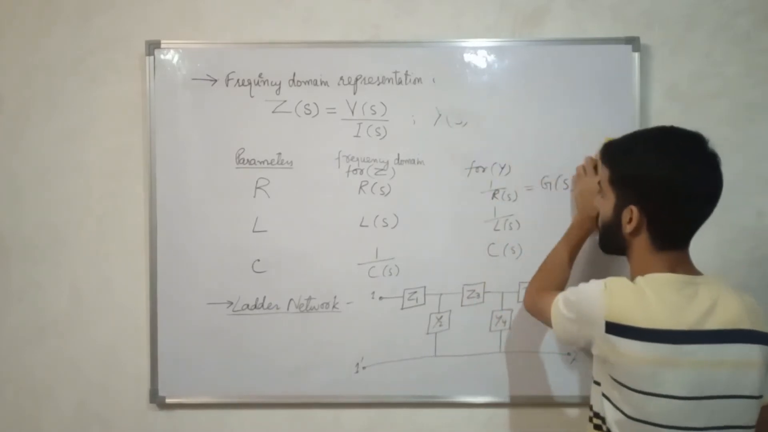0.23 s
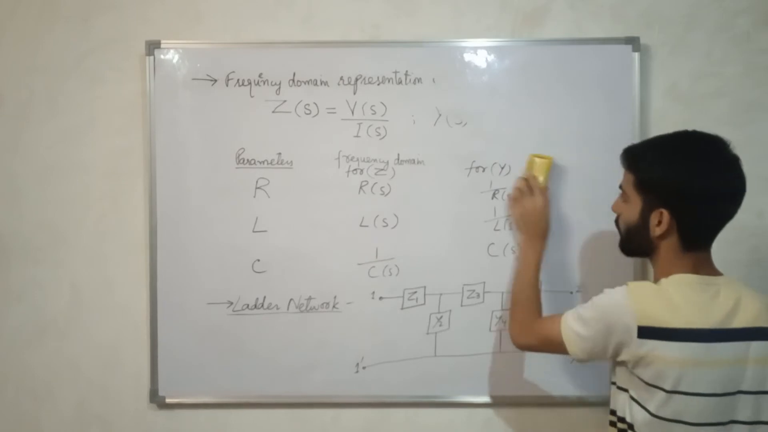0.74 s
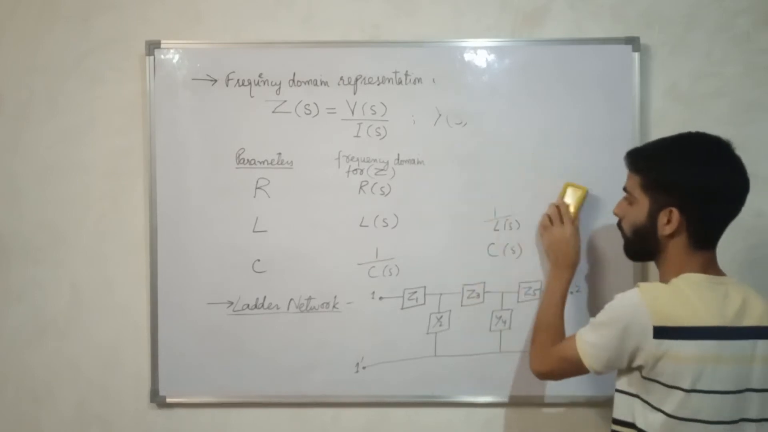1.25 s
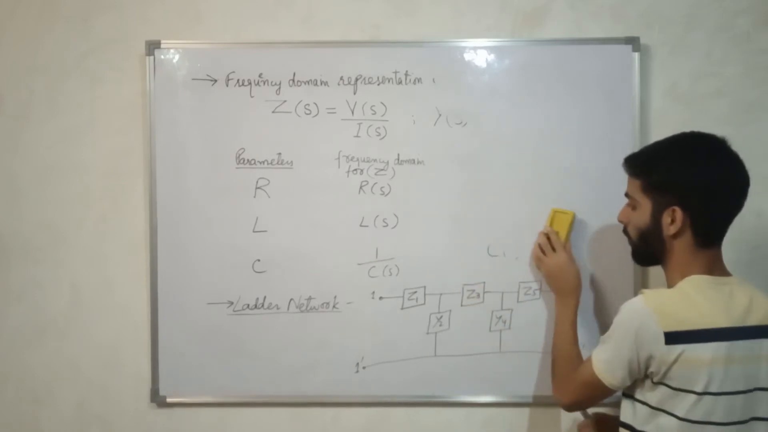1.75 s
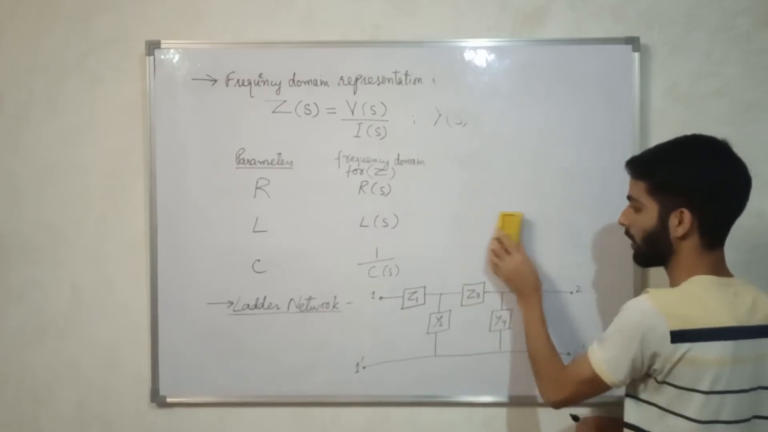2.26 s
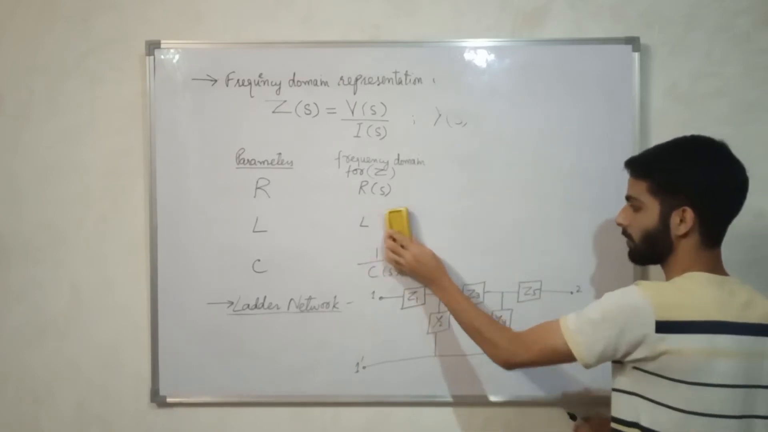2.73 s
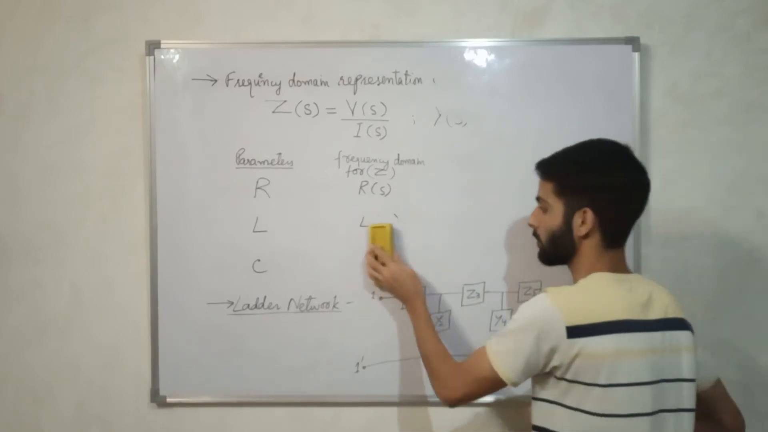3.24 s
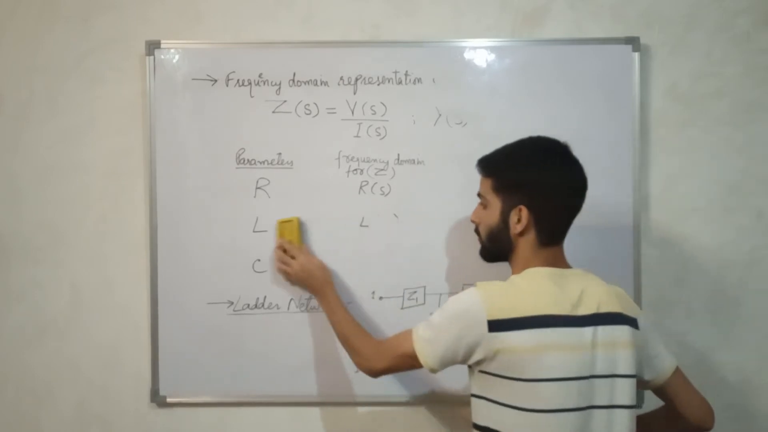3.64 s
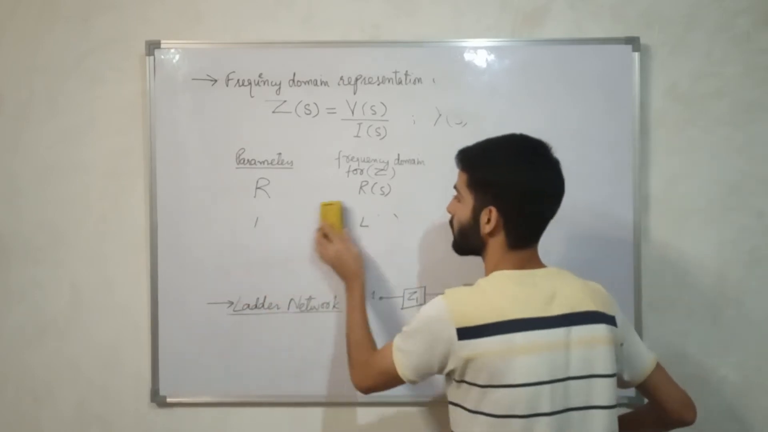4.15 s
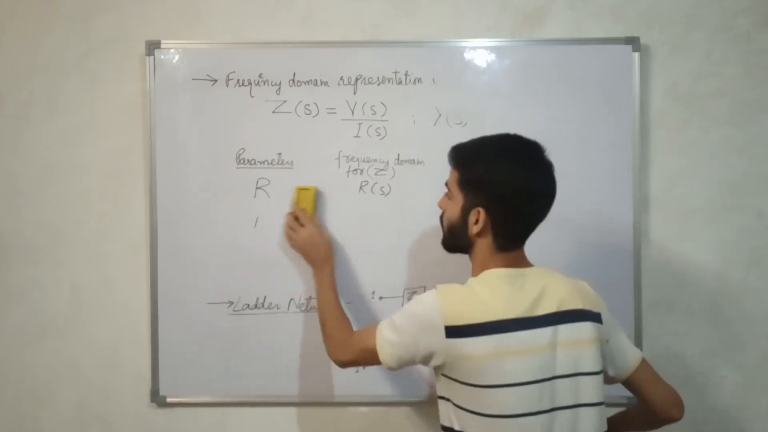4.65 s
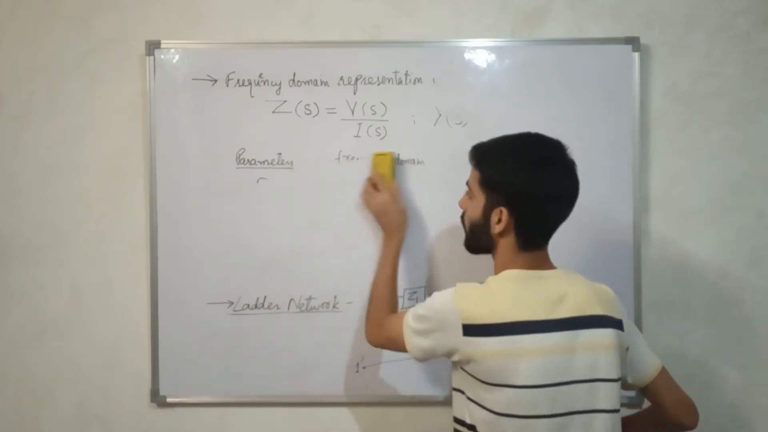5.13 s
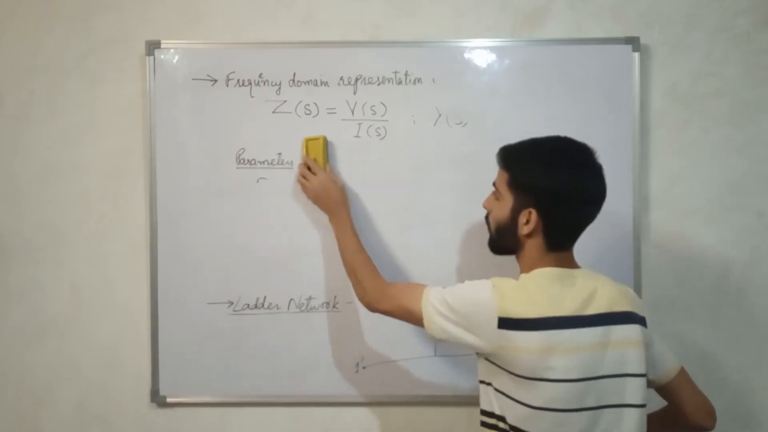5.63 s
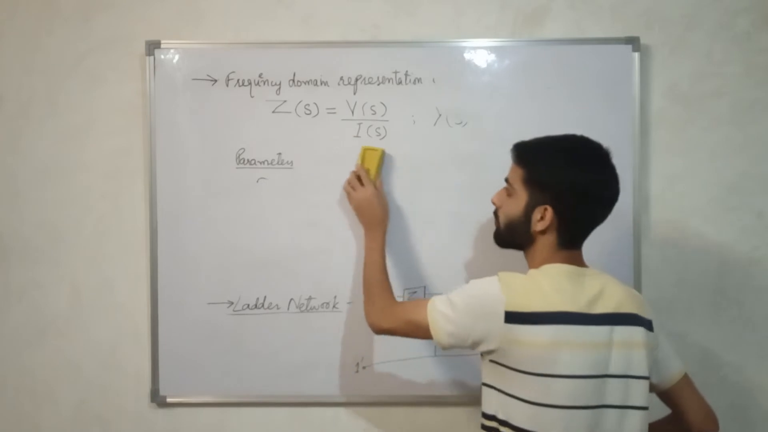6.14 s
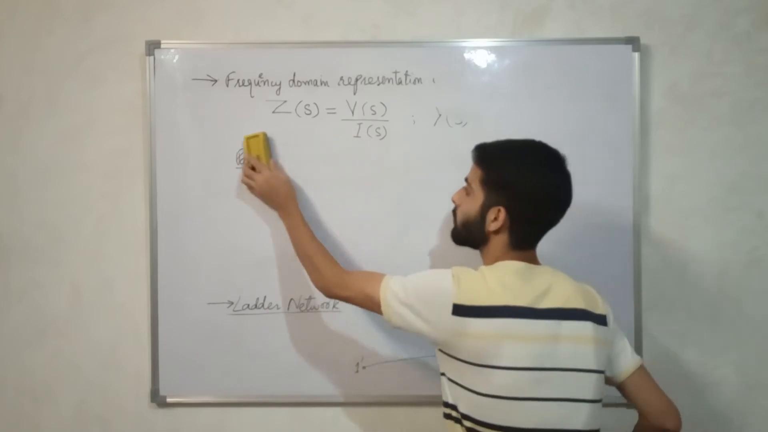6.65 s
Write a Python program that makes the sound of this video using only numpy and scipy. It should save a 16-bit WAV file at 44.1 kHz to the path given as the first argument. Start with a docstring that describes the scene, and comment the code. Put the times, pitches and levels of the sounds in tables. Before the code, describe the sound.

Quick back-and-forth felt wipes on a hollow wall board, each swelling and stopping short. Airy high hiss dominates, mixed with rough scraping, low panel boom and irregular plastic knocks, most frequent in the first few seconds. The middle strokes are smoother, then slower wipes bring a few more thumps before a softer, plainer rub at the end. Short reflections of a bare room, a quiet rumbling background, stereo pickup from nearby.

```python
"""A hiss of felt, already in mid-stroke, comes and goes as an eraser is rubbed over a wall-hung whiteboard.
Stick-slip jolts of the fibres make the hiss, coarser ones a lower scrape and the ring of the plastic holder.
Slips of the whole pad drum on the panel's resonances; at times the holder rocks and knocks on the board.
One burst of grit ticks, and a faint rumble with a wavering hum lies underneath, in a small bare classroom."""
import sys
import numpy as np
from scipy import signal
from scipy.fft import rfft, irfft, next_fast_len
from scipy.io import wavfile
from scipy.ndimage import uniform_filter1d, map_coordinates

SR = 44100
rng = np.random.default_rng(int(sys.argv[2]) if len(sys.argv) > 2 else 0)


def generate_wav(sig):
    """Save sig (samples, or channels by samples) to the path in sys.argv[1] as 16-bit PCM at SR."""
    pcm = np.round(np.clip(np.atleast_2d(sig).T, -1, 1) * 32767).astype(np.int16)
    wavfile.write(sys.argv[1], SR, pcm)


N = 303849

# Sweeps of the arm. Each row: start in seconds, end in seconds, where the hand presses hardest (0-1 of the way),
# then nominal levels in dB of the felt's hiss, the scrape, the panel's low modes and its upper modes,
# the holder's ring in dB relative to the scrape, and the treble tilt in dB.
STROKE_TABLE = [(-0.186, 0.272, 0.18, -53, -63.5, -49.5, -58, -12, -0.5),
                (0.293, 0.507, 0.53, -51.5, -60, -52, -60.5, -10, -3.5),
                (0.544, 0.709, 0.2, -52.5, -65.5, -56.5, -67.5, -19, -1),
                (0.699, 1.011, 0.61, -51, -57.5, -40.5, -51.5, -9.5, -1),
                (1.024, 1.32, 0.66, -54.5, -64.5, -48.5, -56.5, -10, 0),
                (1.318, 1.53, 0.51, -51.5, -59, -39.5, -55, -8.5, -2),
                (1.578, 1.8, 0.18, -53, -62.5, -47.5, -55.5, -14, -.2),
                (1.812, 2.032, 0.7, -51, -56.5, -46.5, -53, -12, -1),
                (2.065, 2.242, 0.57, -52.5, -60.5, -52.5, -61, -25, -0.5),
                (2.246, 2.706, 0.16, -51.3, -55.5, -46, -57.5, -14.5, -1),
                (2.742, 2.958, 0.56, -56.5, -65, -60, -73, -14, .1),
                (2.963, 3.249, .45, -52.5, -56.5, -54, -66.5, -16, -0.7),
                (3.247, 3.42, 0.78, -55.5, -62.5, -54, -67, -20, -0.5),
                (3.44, 3.964, 0.26, -51.5, -56, -49, -62, -15, -0.6),
                (3.981, 4.461, 0.7, -53, -63.5, -48, -61, -11.5, 1),
                (4.476, 4.947, 0.27, -50, -55, -43.5, -58.5, -14.5, -1.3),
                (4.958, 5.394, 0.54, -52, -62, -44.5, -56, -8.5, 0),
                (5.405, 5.716, 0.57, -52.5, -57, -42.5, -52.5, -7.5, 0),
                (5.742, 6.006, 0.47, -53, -62.5, -43, -58.5, -9, -0.5),
                (6.027, 6.494, 0.14, -54, -57, -50, -65, -12, -0.5),
                (6.407, 6.947, 0.23, -55.5, -59.5, -61.5, -67.5, -10.5, -1.5)]
# Spectrum of rubbed felt fibres. Each row: frequency in Hz, relative level in dB.
FELT_SPECTRUM = [(600, -33), (1200, -19.5), (2000, -20), (3200, -16), (4200, -9), (5500, -9), (7000, -7.5),
                 (8000, -2), (9300, -0.5), (10300, -2.5), (12000, -10.5), (14000, -14.5), (16000, -17.5)]


def amp(db):
    """Decibels to amplitude ratio."""
    return 10 ** (np.asarray(db) / 20)


def unit(x):
    """Normalisation to rms 1."""
    return x / np.sqrt(np.mean(x ** 2) + 1e-20)


def along(points, hz):
    """Interpolation of (Hz, value) points on a logarithmic frequency axis."""
    f, v = np.transpose(points)
    return np.interp(np.log(hz + 1), np.log(f + 1), v)


def wobble(rate):
    """Smooth random modulation: a spline through random knots, rate of them a second."""
    knots = rng.standard_normal(int(N * rate / SR) + 4)
    return map_coordinates(knots, [np.arange(N) * rate / SR])


def filtered(x, response):
    """Linear filtering: the spectrum of x times a response of frequency."""
    m = next_fast_len(N + SR // 2)
    hz = np.fft.rfftfreq(m, 1 / SR)
    return irfft(rfft(x, m) * response(hz), m)[..., :N]


def coloured(x, spectrum):
    """Spectral shaping of x by a table of levels, at rms 1."""
    return unit(filtered(x, lambda hz: amp(along(spectrum, hz))))


def low_and_upper(x, split_hz=356):
    """Crossover: x parted into what lies below and above a frequency."""
    low = filtered(x, lambda hz: 1 / (1 + (hz / split_hz) ** 20))
    return low, x - low


def tilted(x, tilt_db, pivot_hz):
    """Shelving: a positive tilt lifts what lies above the pivot by half and lowers the rest by half."""
    low, upper = low_and_upper(x, pivot_hz)
    return low * amp(-tilt_db / 2) + upper * amp(tilt_db / 2)


def spread(pair, alike=None):
    """Coherence of a diffuse field: two unrelated signals become left and right, alike by frequency."""
    if alike is None:
        # Coherence of the channels. Each row: frequency in Hz, left-right likeness (0-1).
        alike = [(50, 0), (110, 0.8), (180, 1), (270, 0.94), (400, 0.8), (700, 0.56), (1250, 0),
                 (16000, 0.012)]

    def mid_and_side(hz):
        turn = np.arccos(np.clip(along(alike, hz), -1, 1)) / 2
        return np.array([np.cos(turn), np.sin(turn)])

    mid, side = filtered(pair, mid_and_side)
    return np.array([mid + side, mid - side])


def slips(rate, scatter_db):
    """Stick-slip friction: two trains of jolts, rate a second, random in time, sign and size; rms 1."""
    caught = rng.random((2, N)) < rate / SR
    sizes = amp(scatter_db * rng.standard_normal((2, N)))
    return unit(caught * sizes * rng.choice([-1, 1], (2, N)))


def background(rumble_db=-62, hum_db=-70.5, hum_hz=95.8, wander_hz=1.0, waver_db=3):
    """Superposition of broadband low room noise and a faint hum that wavers in pitch and level."""
    # Room noise. Each row: frequency in Hz, relative level in dB.
    rumble_spectrum = [(20, -46), (33, -19), (45, -1.5), (56, -5), (75, 1.5), (120, 4.5), (180, 2),
                       (280, -6.5), (450, -6), (800, -16), (1500, -21.5), (5000, -22), (16000, -53)]
    # Coherence of the room noise. Each row: frequency in Hz, left-right likeness (0-1).
    rumble_alike = [(50, 0.17), (110, 0.32), (250, 0.018), (700, 0.07), (1250, 0.12)]
    rumble = coloured(spread(rng.standard_normal((2, N)), rumble_alike), rumble_spectrum)
    phase = 2 * np.pi * np.cumsum(hum_hz + wander_hz * wobble(5.4)) / SR
    hum = np.sin(phase) * amp(waver_db * wobble(6))
    return amp(rumble_db) * rumble + amp(hum_db) * unit(hum)


def room(x):
    """Reverberation: absorption by the walls makes every frequency die at its own speed."""
    # Decay of the room. Each row: frequency in Hz, time to fall by 60 dB in seconds.
    wall_decay = [(150, 0.78), (500, 0.43), (3000, 0.25), (12000, 0.061)]
    hz, t, z = signal.stft(rng.standard_normal((2, SR // 2)), SR, nperseg=256)
    decay = amp(-60 * t / along(wall_decay, hz)[:, None])
    tail = signal.istft(z * decay, SR, nperseg=256)[1]
    tail = np.pad(tail / np.linalg.norm(tail[0]), ((0, 0), (SR // 200, 0)))  # walls answer 5 ms late
    return spread(signal.fftconvolve(np.atleast_2d(x), tail, axes=1)[:, :N])


def near_walls(pair, echo_db, reach_s, count=8):
    """Interference: early reflections within reach_s put a fine fixed ripple on the spectrum."""
    paths = np.zeros((2, SR // 20))
    paths[:, 0] = 1  # direct sound
    for path in paths:
        delays = (rng.uniform(.1, 1, count) * reach_s * SR).astype(int)
        path[delays] += amp(echo_db) * rng.choice([-1, 1], count)
    return signal.fftconvolve(pair, paths, axes=1)[:, :N]


def grit(tick_t60=.005, tick_db=-5, wet_db=-4):
    """Impulsive release: a hard speck snaps free under the felt with a few ticks (decay in seconds)."""
    # Ticks. Each row: start in seconds, level in dB before the common tick_db.
    ticks_table = [(3.932, -35.5), (3.938, -44), (3.947, -38)]
    t = np.arange(N) / SR
    bursts = sum((t >= s) * amp(db + tick_db - 60 * np.abs(t - s) / tick_t60) for s, db in ticks_table)
    ticks = bursts * coloured(rng.standard_normal((2, N)), FELT_SPECTRUM)
    return ticks + amp(wet_db) * room(ticks)


def panel_ring():
    """Modal impulse response: one jolt gives a short low bump and ringing modes, peak 1."""
    # Broad response of the board. Each row: frequency in Hz, relative level in dB.
    panel_spectrum = [(40, -35), (100, -19.5), (170, -5), (250, -1.5), (320, -4), (400, -11.5),
                      (520, -15.5), (650, -24.5), (1000, -30.5), (2000, -55), (5000, -100)]
    # Resonances of the board. Each row: centre in Hz, width in Hz, lift in dB.
    modes = [(148, 21, 3), (180.6, 16, 1), (223.3, 19, 5), (244.7, 16.4, 8.5), (261.9, 27, 7.5),
             (292.9, 9.8, 11), (331.6, 20, 6.5), (400.3, 35, 9.5), (479, 47, 9), (593, 21.5, 9),
             (689, 32, 5), (797, 24, 7.5), (835, 16, -12)]
    hz = np.fft.rfftfreq(SR, 1 / SR)
    db = along(panel_spectrum, hz)
    db = db + sum(lift / (1 + (2 * (hz - centre) / width) ** 2) for centre, width, lift in modes)
    cepstrum = irfft(np.log(amp(db)))[:SR // 2]
    cepstrum[0] = 0
    ring = irfft(np.exp(rfft(2 * cepstrum, SR)))[:SR // 2]  # minimum phase: nothing sounds before the jolt
    return ring / np.abs(ring).max()


def knocks(ring, clack_db=9.5, clack_t60=0.23, rise_s=0.0022, lag_s=0.00365, upper_db=-4, wet_db=-9,
           bloom_db=-7, tick_db=2, tick_t60=0.0083, judder_db=-19, judder_t60=0.4, judder_rise_s=.009):
    """Impact: the tipping holder gives a tick, a panel thump, a cushioned rattle and a dying judder."""
    # Bumps of the holder. Each row: start in seconds, nominal thump level in dB, clack level in dB before
    # the common clack_db, lift of the upper modes in dB, low-pass cutoff of the clack in Hz.
    bumps = [(0.012, -47.5, -64, 6, 1800), (0.797, -36, -80, -16, 5000), (0.885, -46.5, -69, -16, 5000),
             (0.944, -31.5, -62, 7, 5000), (1.264, -41, -64, -6, 5000), (1.45, -30, -74, -21, 5000),
             (1.513, -27.5, -58, 5.5, 5500), (1.776, -38.5, -66, 5, 4500), (1.945, -39.5, -67, 2, 5000),
             (2.219, -36.5, -61, 9.5, 6500), (2.298, -34.5, -65.5, 7.5, 3500), (2.753, -39.5, -63, 3, 2200),
             (3.535, -31, -73, -24, 5000), (4.241, -38.5, -79, -11, 5000), (4.574, -35.5, -90, -16, 5000),
             (5.598, -34.5, -68, -2, 5000), (5.871, -32, -60, 7.5, 4500), (6.037, -37.5, -79, -16, 5000)]
    # Plastic rattle. Each row: frequency in Hz, relative level in dB.
    clack_spectrum = [(200, -14), (450, -2), (750, 5), (1100, 0), (1550, 0), (2000, -2), (2700, 7),
                      (3400, -5), (4200, 7.5), (5500, -19), (9000, -17), (16000, -25)]
    t = np.arange(SR // 3) / SR
    fade = amp(-60 * t / clack_t60) * (1 - np.exp(-t / rise_s))
    fade = fade + amp(tick_db - 60 * t / tick_t60)  # the crisp tick
    settle = amp(-60 * t / judder_t60) * (1 - np.exp(-t / judder_rise_s))
    chatter = coloured(spread(rng.standard_normal((2, N))), clack_spectrum)
    shaken = spread(slips(rate=1100, scatter_db=2.5))
    shaken = unit(signal.fftconvolve(shaken, ring[None], axes=1)[:, :N])
    shaken = unit(tilted(shaken, 9.6, pivot_hz=340))
    blows, clack = np.zeros((2, N)), np.zeros((2, N))  # rows of blows: for the low and the upper modes
    for s, peak_db, rattle_db, lift_db, edge_hz in bumps:
        start = round(s * SR)
        span = slice(start, start + len(t))
        blows[:, start] = amp([peak_db, peak_db + lift_db])
        cushion = signal.butter(2, edge_hz, fs=SR, output="sos")
        clack[:, span] += amp(rattle_db + clack_db) * signal.sosfilt(cushion, chatter[:, span] * fade)
        clack[:, span] += amp(peak_db + min(lift_db, 0) + judder_db) * shaken[:, span] * settle
    low, upper = low_and_upper(signal.fftconvolve(blows, ring[None], axes=1)[:, :N])
    # bending waves are slower in the bass, so the thump swells over a cycle or two; lag_s is the delay at 250 Hz
    thump = filtered(low[0] + amp(upper_db) * upper[1],
                     lambda hz: np.exp(-4j * np.pi * lag_s * np.sqrt(hz * 250)))
    # the upper modes radiate widely and arrive largely by way of the walls
    return thump + clack + room(amp(wet_db) * (thump + clack) + amp(bloom_db) * upper[1])


def stroke_gain(levels_db, ease_db, linger_s):
    """Friction power: a layer follows the hand's speed and pressure; ease_db is its loss at light ends."""
    speed_up_s, brake_s = 0.062, 0.018  # the arm gathers speed gently and stops short
    ease_power = 1.61  # how the pressure falls away on either side of its peak
    power = np.zeros(N)
    for (start, end, hardest, *_), db in zip(STROKE_TABLE, levels_db):
        span = np.arange(max(int(start * SR), 0), min(int(end * SR), N))
        t = span / SR
        speed = np.tanh((t - start) / speed_up_s) * np.tanh((end - t) / brake_s)
        way = (t - start) / (end - start)
        slack = np.abs(np.maximum(1 - way / hardest, (way - hardest) / (1 - hardest))) ** ease_power
        power[span] += (speed * amp(db - ease_db * slack)) ** 2
    keep = np.exp(-1 / (linger_s * SR))  # the sound hangs on briefly after the hand stops
    return np.sqrt(signal.lfilter([1 - keep], [1, -keep], power))


def swing_damped(x, damping):
    """Level-dependent damping: the drumming stays lumpy, its largest swings slightly damped; rms 1."""
    swing = np.abs(uniform_filter1d(np.mean(x ** 2, axis=0), size=SR // 25)) + 1e-12
    return unit(x / swing ** damping)


def drumming(ring, upper_gain_db=-0.96, linger_s=.042):
    """Modal excitation: slips of the whole pad shake the panel; place on the board decides which modes answer."""
    *_, low_db, upper_db, _, _ = np.transpose(STROKE_TABLE)
    boom = signal.fftconvolve(spread(slips(rate=1500, scatter_db=1.5)), ring[None], axes=1)[:, :N]
    low, upper = low_and_upper(boom)
    low_gain = stroke_gain(low_db, ease_db=23, linger_s=linger_s)
    upper_gain = stroke_gain(upper_db + upper_gain_db, ease_db=18.5, linger_s=linger_s)
    return low_gain * swing_damped(low, damping=0.12) + upper_gain * swing_damped(upper, damping=0.07)


def holder(x):
    """Resonance: x rings in the modes of the hollow plastic holder, summed with alternating sign."""
    # Resonances of the holder. Each row: centre in Hz, width in Hz, relative level in dB.
    holder_modes = [(1307, 21, 2), (1364, 17, 0), (1410, 5.7, 7.5), (1483, 12, 3.5), (1610, 56, -0.5),
                    (1760, 29, -2), (2130, 130, -4.5)]

    def response(f):
        total = 0
        for k, (centre, width, db) in enumerate(holder_modes):
            loss = 2j * f * width
            total = total + (-1) ** k * amp(db) * loss / (centre * centre - f * f + loss)
        return total

    return filtered(x, response)


def felt(ripple_db=-20, reach_s=.012, hiss_gain_db=0.04, scrape_gain_db=0.3, ring_gain_db=.2):
    """Stick-slip: countless fibres hiss, the pressed pad scrapes more coarsely and the holder rings."""
    # Scrape of the flat pad. Each row: frequency in Hz, relative level in dB.
    scrape_spectrum = [(500, -12), (1150, -20.5), (1500, -9.5), (1900, -10.5), (2300, -6), (2800, -1.5),
                       (3400, -3), (4100, 2), (5000, -3), (7000, -8.5), (12000, -24), (16000, -37)]
    start, end, _, hiss_db, scrape_db, _, _, ring_db, tilt_db = np.transpose(STROKE_TABLE)
    scrape_linger_s = 0.031
    # tipped onto its edge the felt sounds brighter
    tip_db = np.interp(np.arange(N) / SR, (start + end) / 2, tilt_db)
    uneven = amp(0.35 * wobble(45) + 0.15 * wobble(14))  # the pad grips unevenly

    fibres = near_walls(spread(slips(rate=14000, scatter_db=2.5)), ripple_db, reach_s)
    fibres = tilted(coloured(fibres, FELT_SPECTRUM), tip_db, pivot_hz=9200)
    hiss = stroke_gain(hiss_db + hiss_gain_db, ease_db=3.5, linger_s=0.023) * fibres

    pad = near_walls(spread(slips(rate=4000, scatter_db=0.0)), ripple_db, reach_s)
    pad = tilted(coloured(pad, scrape_spectrum), 2.1 * tip_db + 1.6 * wobble(10), pivot_hz=3700)
    scrape = stroke_gain(scrape_db + scrape_gain_db, ease_db=4, linger_s=scrape_linger_s) * pad

    ringing = unit(holder(slips(rate=3000, scatter_db=1.5)))
    hollow_db = scrape_db + ring_db + ring_gain_db
    hollow = stroke_gain(hollow_db, ease_db=5.5, linger_s=scrape_linger_s) * ringing
    return uneven * (hiss + scrape) + hollow


def scene():
    """Superposition of the eraser's sounds on the board and the room's own noise."""
    ring = panel_ring()
    return felt() + drumming(ring) + knocks(ring) + grit() + background()


def record(dry, top_hz=15750):
    """Band-limiting: nothing at or above top_hz is kept."""
    return filtered(dry, lambda hz: hz < top_hz)


dry = scene()
out = record(dry)
generate_wav(out)
```